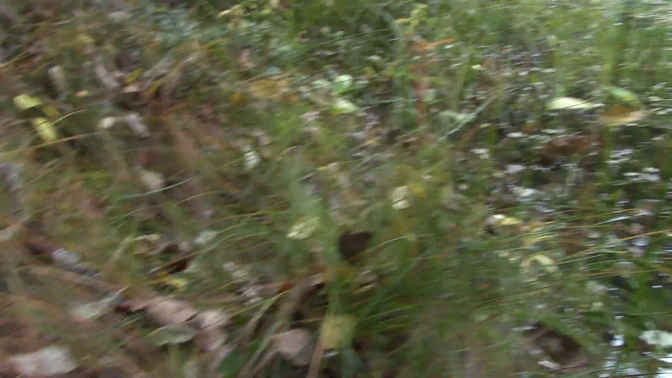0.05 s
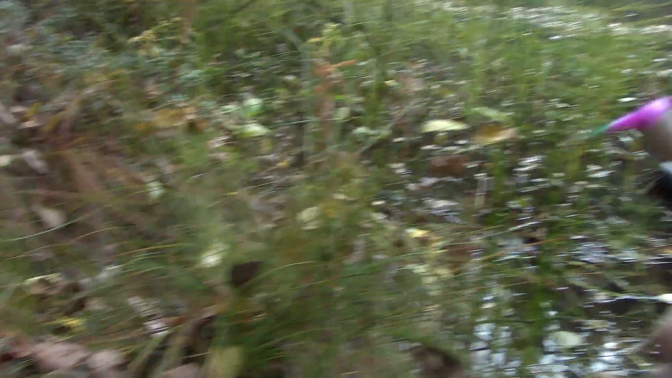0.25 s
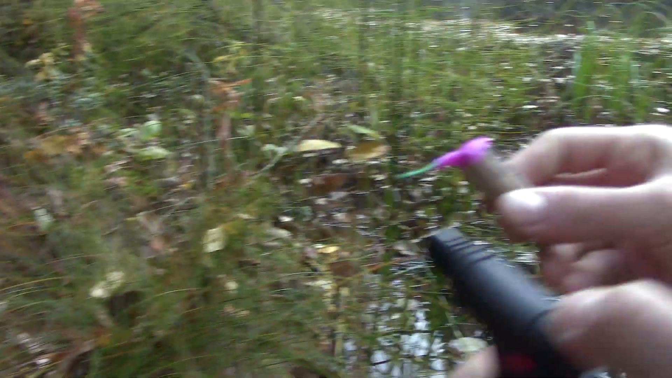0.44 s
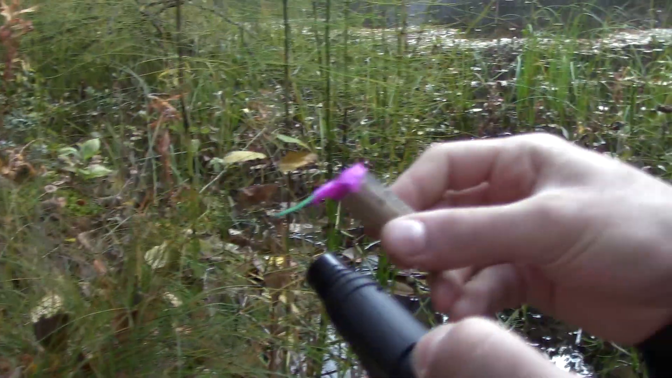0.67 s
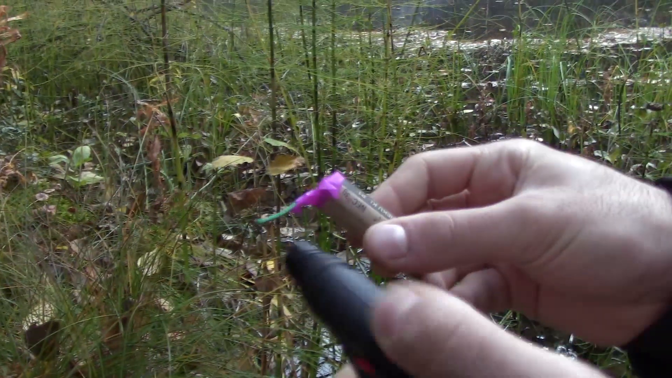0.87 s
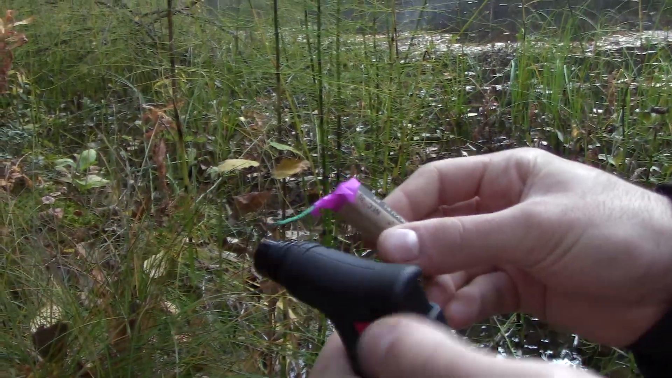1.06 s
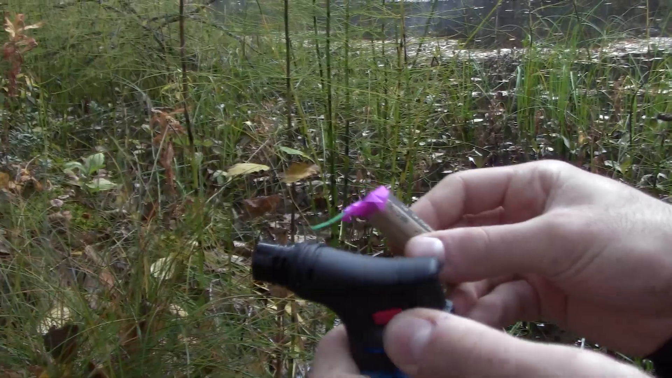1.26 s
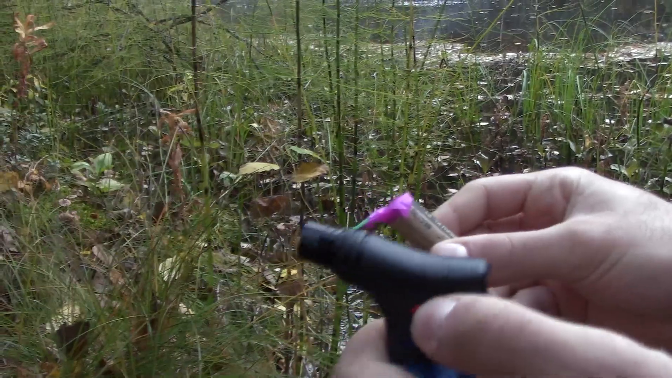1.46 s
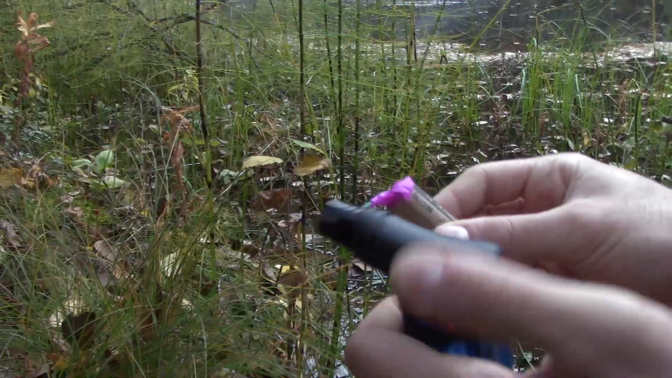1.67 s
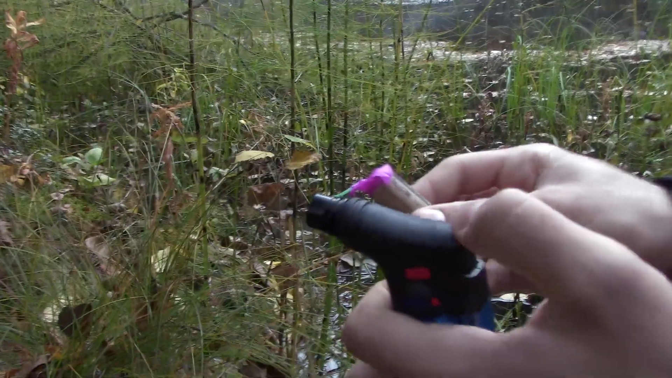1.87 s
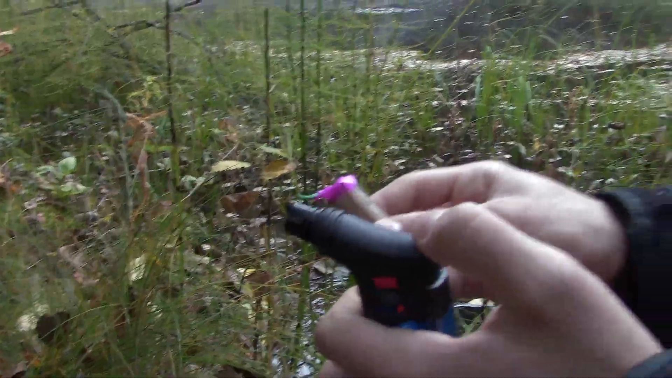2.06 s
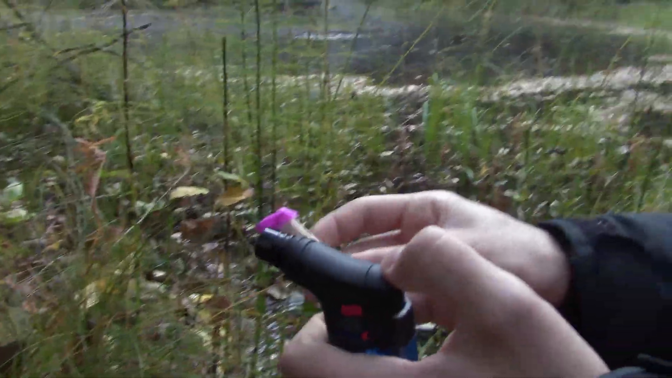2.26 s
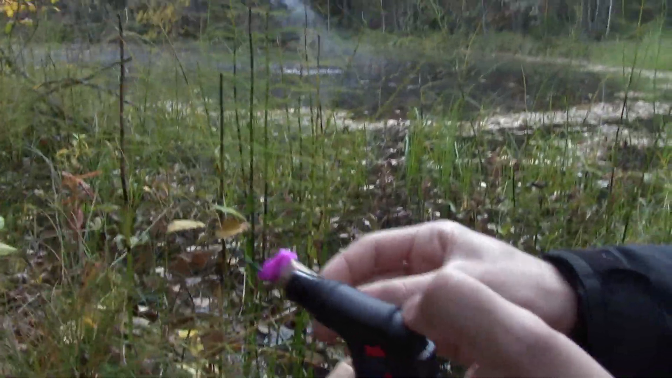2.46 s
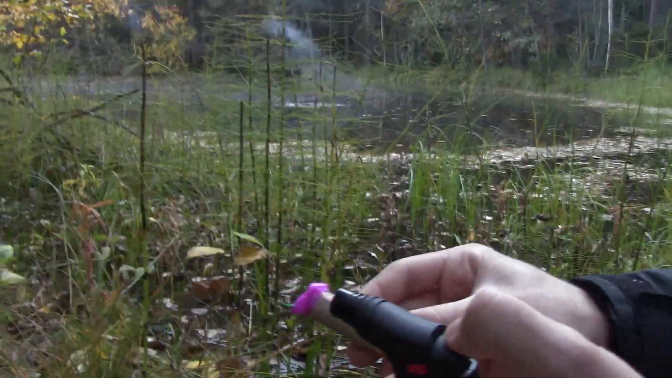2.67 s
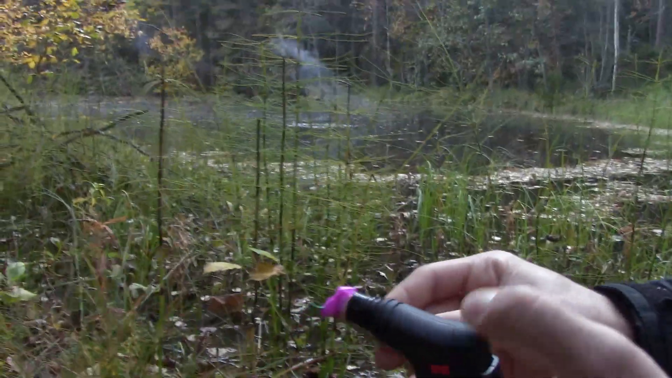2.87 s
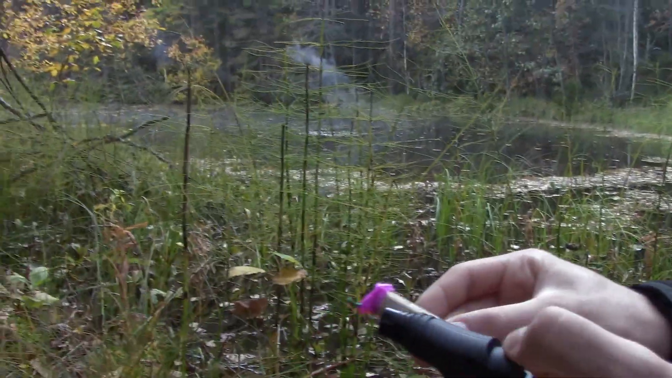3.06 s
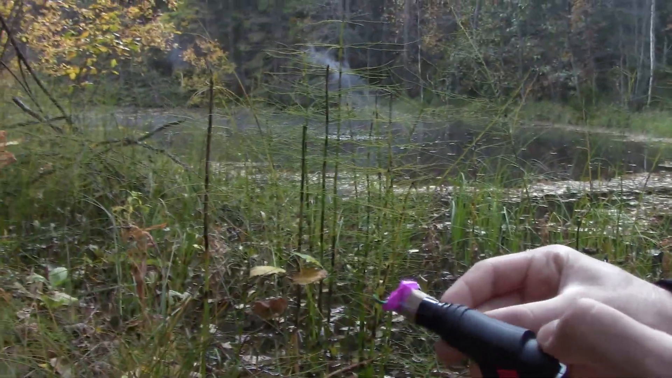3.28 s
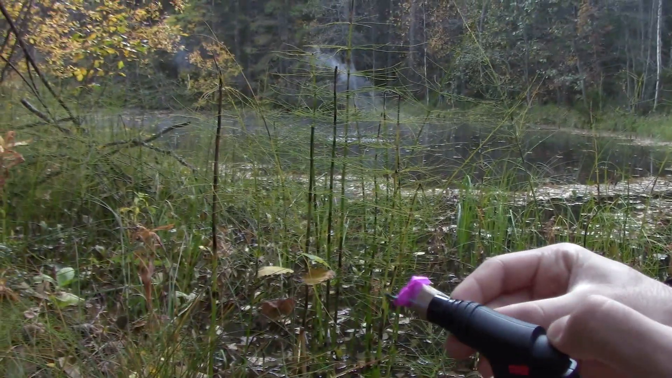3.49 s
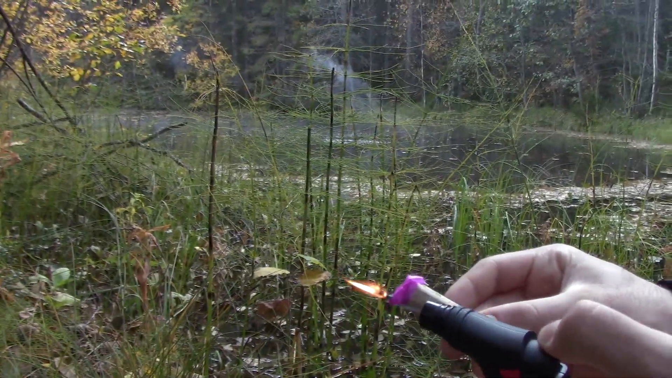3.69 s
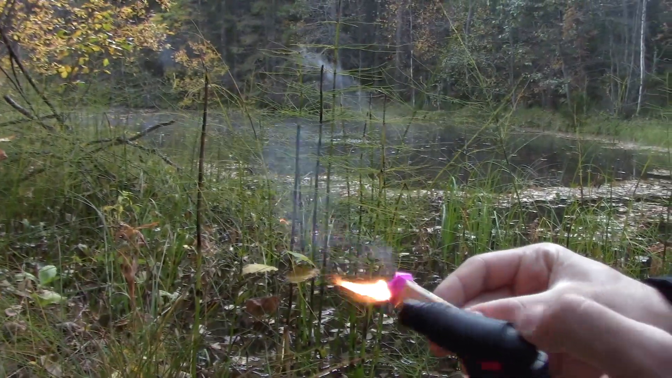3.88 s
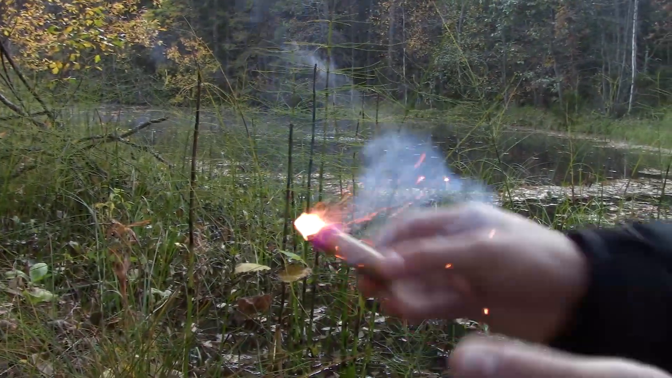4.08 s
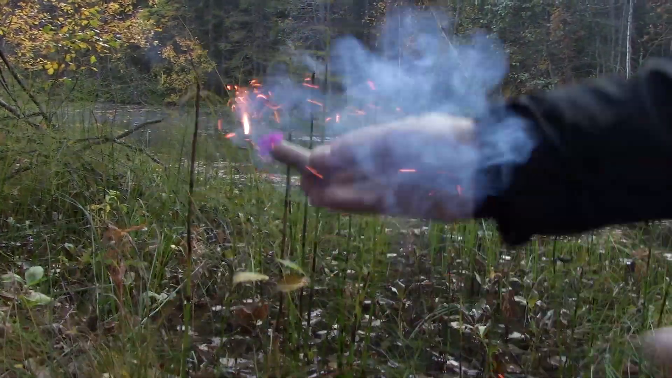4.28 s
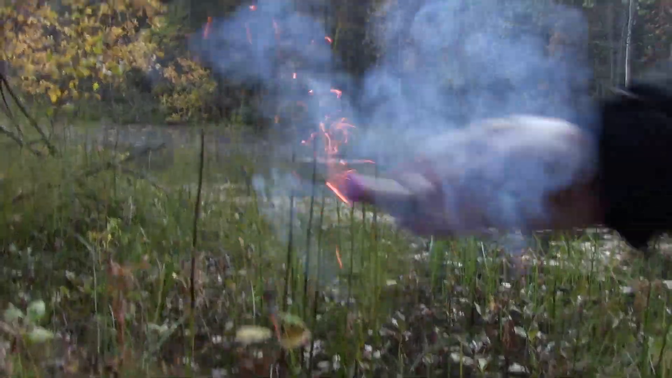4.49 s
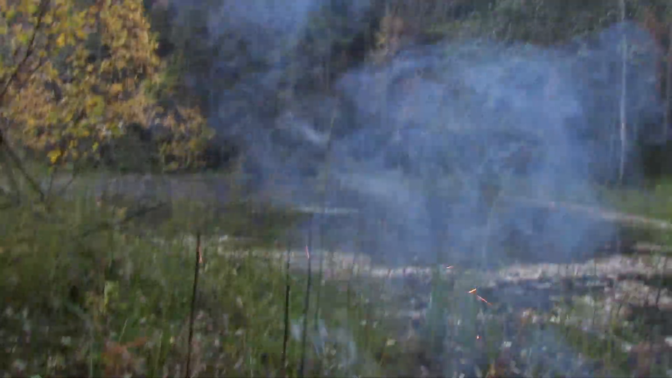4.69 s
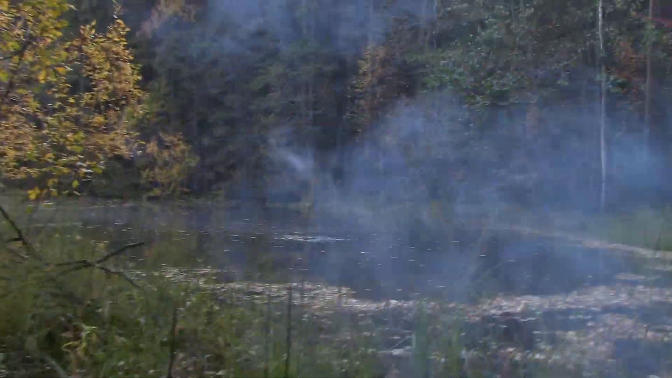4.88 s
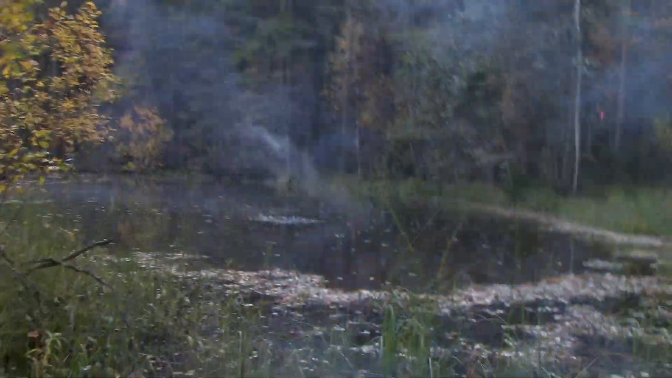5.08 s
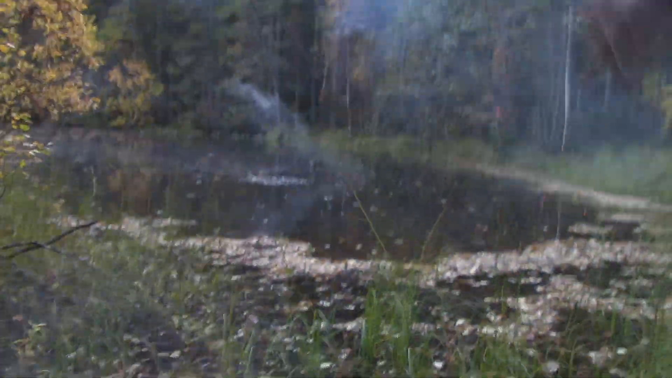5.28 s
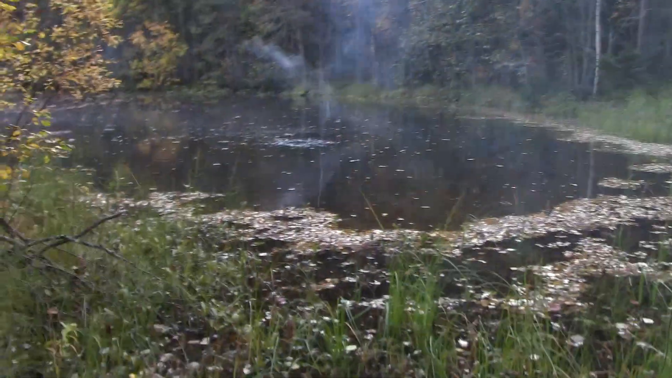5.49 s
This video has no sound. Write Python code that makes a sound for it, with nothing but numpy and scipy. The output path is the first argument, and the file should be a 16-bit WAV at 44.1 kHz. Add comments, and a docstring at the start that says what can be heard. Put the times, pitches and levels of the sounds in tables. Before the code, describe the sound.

Quiet open-air forest bed, faint and steady, with close stereo handling in front. From 0 to 0.35 s, dry grass or sleeve rustle with soft bumps. Between 0.4 and 1.2 s, a cluster of small plastic and metal ticks as the torch is turned, busiest at 0.5-0.9. A crisp fabric stroke comes around 1.6, then hollow tank taps from 1.9 to 2.5. At 2.58 a very loud, sharp trigger snap, followed by thin gas hiss until a release click near 2.87. A second loud snap at 3.07 lights a quiet, flickering roaring jet until about 3.95, ending with a click. The fuse catches at 3.7, fizzing and crackling, swelling from 4.1; a tiny rising whistle at 4.2, then rough spits from 4.4 to 5.0 as it flares. Thrown aside, it weakens into a faint sputter by 5.5, while dry stems snap and feet thud softly from 5.1.

```python
"""Beside a quiet forest pond, hands turn a plastic gas torch over, work its trigger twice and light a fuse.
Touches ring the torch's tank, shell and metal. The first snap only lets gas hiss, the second lights a
roaring jet, both flickering noise. The fuse, noise and ringing grains, flares, spits and whistles once, then
is thrown away and fades while dry stems crack underfoot."""
import sys
import numpy as np
from scipy import signal
from scipy.fft import rfft, irfft, next_fast_len
from scipy.io import wavfile

SR = 44100
rng = np.random.default_rng(int(sys.argv[2]) if len(sys.argv) > 2 else 0)


def field_ratio(decibels):
    """Amplitude ratio for a level in dB (20 dB per decade); scalars and array-likes work."""
    return 10 ** (np.asarray(decibels, dtype=float) / 20)


def unload_audio(sound):
    """Save the sound as a 16-bit wav file, at the path given as the first command line argument."""
    columns = np.transpose(np.atleast_2d(sound))
    # keep every value between -1 and 1, then stretch to whole-number steps
    steps = np.round(np.clip(columns, -1, 1) * 32767)
    wavfile.write(sys.argv[1], SR, steps.astype(np.int16))


N = 244529   # samples

# Forest air spectrum. Each row: frequency in Hz, density in dB per Hz.
FOREST_SPECTRUM = [(20, -31), (110, -14.5), (350, -7.5), (600, -2), (1050, -6), (1450, -9.5), (2000, -15.5),
                   (2700, -22), (7000, -29), (16000, -39)]
# Left-right likeness of noise. Each row: frequency in Hz, likeness from 0 to 1.
LIKENESS_CURVE = [(60, 0.83), (240, .9), (950, 0.99), (15000, 0.81)]
# Dull bumps of hands, arm and feet. Each row: start in seconds, peak in dB, pitch in Hz.
BUMP_EVENTS = [(0.178, -42, 260), (1.517, -38, 613), (1.602, -32, 1310), (2.582, -39.5, 255),
               (2.828, -42.5, 263), (3.074, -36.5, 316), (3.928, -44, 140), (5.21, -40.5, 106),
               (5.252, -32, 444), (5.325, -49, 89), (5.454, -33, 690)]
# Strokes of sleeve and grass. Each row: start, quickest moment and stop in seconds, level in dB and
# brightness in dB, both at the quickest.
STROKE_EVENTS = [(0, .005, 0.23, -55.5, 9), (0.213, 0.27, .35, -64, 2), (1.505, 1.598, 1.66, -53, 7),
                 (2.014, 2.065, 2.09, -66, -3), (2.07, 2.115, 2.9, -70, 10)]
# Dry stems snapping underfoot. Each row: start in seconds, peak in dB, length in ms.
STEM_EVENTS = [(5.1365, -21, 0.1), (5.233, -32, 8.2), (5.27, -33, 1.4), (5.315, -26.5, 0.29)]
# Unlit gas through the nozzle. Each row: time in seconds, level in dB.
GAS_LEVEL = [(2.6, -53.5), (2.83, -53.5)]
# Nozzle hiss spectrum. Each row: frequency in Hz, density in dB per Hz.
NOZZLE_SPECTRUM = [(3000, -22.5), (6400, -20.5), (7800, -8), (8800, -5.5), (10500, -20), (16000, -29)]
# Lit jet. Each row: time in seconds, level in dB.
JET_LEVEL = [(3.08, -44.5), (3.2, -41.5), (3.95, -41)]
# Flame spectrum. Each row: frequency in Hz, density in dB per Hz.
FLAME_SPECTRUM = [(200, -17), (540, -3.5), (1700, 0), (3450, -7), (5400, -19.5), (6600, -15.5),
                  (7800, -14.5), (10000, -20.5), (13000, -20.5), (15600, -23)]
# Gas in the paper tube whistling. One row of moments in seconds: start, loudest, end.
WHISTLE_TIMES = 4.2, 4.225, 4.256
# One row of whistle levels in dB at those moments.
WHISTLE_LEVELS = -35, -22.5, -32
# Loud spits of burning powder. Each row: moment in seconds, peak in dB, centre in Hz.
SPIT_EVENTS = [(4.408, -15.5, 2300), (4.421, -19, 2620), (4.451, -21, 2700), (4.515, -16, 3060),
               (4.54, -15.5, 1820), (4.758, -18, 3100), (4.85, -20.5, 3230), (4.911, -30.5, 1550),
               (5.0, -27, 750)]
# Fuse carried off to one side. Each row: out in seconds, back in seconds, offset (1 = fully aside).
SWING_MOVES = [(4.14, 4.3, 0.43), (4.504, 4.575, 0.37), (4.655, 4.91, 1.0), (5.17, 5.373, 1),
               (5.403, 5.6, 0.61)]
# Band that is hollow while the fuse catches. One row: low edge in Hz, high edge in Hz.
HOLLOW_BAND = [4170, 5700]
# How hollow it is. Each row: time in seconds, depth from 0 to 1.
HOLLOW_DEPTH = [(3.95, 0.52), (4.15, 0.15)]
# Burning fuse. Each row: time in seconds, vigour as sputter level in dB, treble relative to it in dB.
BURN_CURVE = [(3.68, -59, -4), (3.76, -39, -11), (3.85, -40, -10), (3.96, -37.5, -16), (4.11, -34, -14),
              (4.18, -29, -18.5), (4.24, -28, -25), (4.3, -35, -16), (4.36, -34.5, -13.5),
              (4.47, -30.5, -10.5), (4.54, -25.5, -17.5), (4.6, -29.5, -18), (4.68, -32, -12.5),
              (4.78, -32, -30.5), (4.85, -30, -39), (4.93, -36.5, -6), (5.05, -39.5, -15),
              (5.13, -45, -14.5), (5.3, -48, -25.5), (5.54, -53, -21)]
# Low roar of the fuse. Each row: time in seconds, level in dB.
ROAR_LEVEL = [(3.68, -55), (3.84, -44), (4.1, -43), (4.2, -38), (4.29, -38.5), (4.38, -45.5), (4.48, -36.5),
              (4.65, -39.5), (4.75, -39), (4.85, -38), (5.04, -42), (5.12, -53), (5.22, -46), (5.54, -49)]
# Roar spectrum. Each row: frequency in Hz, density in dB per Hz.
ROAR_SPECTRUM = [(60, -23), (130, -10.5), (250, -3.5), (550, 2.5), (1300, -7.5)]
# Hiss of the fuse in layers; the lowest hardly follows the treble's swing, the others about half.
# Each row: low edge in Hz, high edge in Hz, level over the sputter in dB, share of the swing from 0 to 1.
HISS_LAYERS = [(4460, 5900, -11, 0.032), (6550, 7900, -2.5, 0.43), (8700, 9330, -3, 0.53),
               (9700, 11900, -3, 0.62), (13200, 21000, -8, 0.5)]
# Touches on the torch. Each row: start in seconds, peak in dB, hollow tank in dB and metal parts in dB,
# both relative to the plastic shell, contact in ms.
TORCH_TOUCHES = [(0.071, -35, -1, -13, 0.65), (.161, -25.5, 12, -13, 0.57), (.39, -27.5, 5.5, -14, 0.15),
                 (0.4242, -41, -8, -6, .3), (0.4366, -26.5, 7.5, -7.5, 0.4), (.449, -40, -8, 3, 0.35),
                 (.496, -35, -5, -6, 0.31), (0.51, -39, -3, -16, 0.23), (.5253, -22.5, -7, -8, 0.19),
                 (.582, -25, -4, -3, 0.33), (.611, -20, -16, -2, 0.35), (0.6466, -18.5, -15, 1, 0.14),
                 (0.69, -19, -18, -2.5, 0.22), (0.7458, -21, -3, -2, 0.34), (0.853, -19, 2.5, -2.5, 0.7),
                 (0.86, -16.5, 4.5, 4, 0.11), (0.8845, -29, 14, -22, 0.43), (0.9089, -23, -11, -14, 0.084),
                 (0.917, -33, 13, -26, 0.53), (1.112, -40.5, -4, -1, 0.33), (1.168, -23.5, 7.5, 7.5, 0.26),
                 (1.8687, -26.5, 14, -6.5, 0.74), (1.9274, -21.5, 3.5, 1.5, 0.27),
                 (2.243, -27, 10, -8, 0.22), (2.2525, -37, 20, -15, 0.23), (2.3896, -33.5, 10, -11, 0.27),
                 (2.436, -35.5, 12, -3, 0.53), (2.5018, -32.5, 19.5, 11, 3.4), (2.5807, 3.5, 2, 5.5, 0.23),
                 (2.8296, -29, 14, 6, 1.44), (2.872, -7, 4.5, 4, 0.37), (2.958, -13.5, 15.5, -11.5, 0.13),
                 (3.0318, -31, 14, 3, 1.86), (3.0713, 3.5, 3, 1.5, 0.28), (3.933, -27, 15, -5, 2.2),
                 (3.9629, -4.5, -5, -2.5, 0.7)]
# Modes of the torch: tank under 2 kHz, shell to 5 kHz, metal above. Each row: pitch in Hz, level in dB,
# free 60 dB decay in seconds.
TORCH_MODES = [(1433, -4.5, 0.01), (2300, 0.5, 0.0007), (2966, -1, 0.0066), (3285, -10.5, 0.031),
               (4190, -1, 0.0025), (5110, -5, 0.0052), (6590, -5, 0.015), (7125, 1, 0.009),
               (7500, 5.5, 0.0018), (8310, -0.5, 0.011), (9250, -4, 0.0073), (10120, -10.5, 0.012),
               (10770, -7, 0.0039), (13160, -20, 0.0083), (15400, -19.5, 0.0073)]


def rms_one(x):
    """Scale to unit rms."""
    return x / np.sqrt(np.mean(x ** 2) + 1e-20)


def in_time(rows, fade_s=0.0047):
    """Columns as curves per sample, after a gate that fades in and out at the ends of the table."""
    s, *columns = np.transpose(rows)
    t = np.arange(N) / SR
    gate = np.clip(np.minimum(t - s[0] + fade_s, s[-1] + fade_s - t) / fade_s, 0, 1)
    return [gate] + [np.interp(t, s, column) for column in columns]


def at_hz(points, hz):
    """Read a spectrum on a log-frequency axis."""
    point_hz, values = np.transpose(points)
    return np.interp(np.log(hz), np.log(point_hz), values)


def drift(rate):
    """Slow chance of spread 1, changing about rate times a second."""
    r = np.exp(-80 * np.pi * rate / SR)   # drawn once every 40 samples
    noise = rng.standard_normal(N // 40 + 2002)
    slow = signal.lfilter([1], [1, -2 * r, r * r], noise)[2000:]
    return np.interp(np.arange(N) / 40, np.arange(len(slow)), rms_one(slow))


def ring(clicks, hz, t60):
    """A unit click sets a decaying sine of about unit height ringing."""
    r, w = field_ratio(-60 / (t60 * SR)), 2 * np.pi * hz / SR
    return signal.lfilter([0, np.sin(w)], [1, -2 * r * np.cos(w), r * r], clicks + 1e-18)


def thin(x, hz):
    """Steep low cut."""
    return signal.sosfilt(signal.butter(4, hz, "high", fs=SR, output="sos"), x)


def dull(x, hz):
    """Gentle high cut."""
    return signal.sosfilt(signal.butter(2, hz, fs=SR, output="sos"), x)


def coloured(spectrum, x):
    """Shape a steady sound by a spectrum that falls away steeply beyond its ends; rms 1."""
    size = next_fast_len(N)
    hz = np.maximum(np.fft.rfftfreq(size, 1 / SR), 10)
    octaves_beyond = np.abs(np.log2(hz / np.clip(hz, spectrum[0][0], spectrum[-1][0])))
    gain = field_ratio(at_hz(spectrum, hz) - 24 * octaves_beyond)
    return rms_one(irfft(rfft(x, size) * gain, size)[..., :N])


def air(spectrum, flicker_db, rate, width=0.1):
    """Turbulent noise, its level flickering; width sets how far the channels differ."""
    mid, side = rng.standard_normal((2, next_fast_len(N)))
    hz = np.maximum(np.fft.rfftfreq(len(side), 1 / SR), 10)
    unlike = np.sqrt(np.clip(1 - at_hz(LIKENESS_CURVE, hz), 0, 1))
    side = irfft(rfft(side) * unlike, len(side)) * width
    return coloured(spectrum, np.array([mid + side, mid - side])) * field_ratio(flicker_db * drift(rate))


def grains(per_s, spread_db):
    """Clicks at random moments, a few much larger than the rest."""
    sizes = field_ratio(spread_db * np.minimum(rng.exponential(1, N), 5)) * rng.choice([-1, 1], N)
    return sizes * (rng.random(N) < per_s / SR)


def burst(length_ms, noise):
    """A noise that swells and dies within a few lengths."""
    t = np.arange(len(noise)) / (max(length_ms, 0.03) * SR / 1000)
    return noise * t * np.exp(-t)


def add(out, s, peak_db, sound):
    """Place a sound with a given peak."""
    at = round(s * SR)
    out[at:at + len(sound)] += (field_ratio(peak_db) * sound / np.max(np.abs(sound)))[:N - at]


def aside(x, offset):
    """Off centre, a source is louder in the near channel and reaches it a fraction of a sample sooner."""
    side = offset * (0.049 * x + 0.3 * np.gradient(x, axis=-1))
    return x + side * np.array([[-1], [1]])


def forest():
    """Quiet air all around: wide noise that flickers slowly."""
    return field_ratio(-51) * air(FOREST_SPECTRUM, flicker_db=0.5, rate=4, width=1.0)


def hum():
    """A faint steady sine, slightly stronger on the left."""
    hum_hz, peak_db = 69, np.array([[-72], [-74]])
    return field_ratio(peak_db) * np.sin(2 * np.pi * hum_hz * np.arange(N) / SR)


def trees(x):
    """Scattered, duller returns from ground, hands and stems, different on each side."""
    build_s, t60 = 0.0058, 0.079
    t = np.arange(round(0.06 * SR)) / SR
    tail = rng.standard_normal((2, len(t))) * field_ratio(-60 * t / t60) * np.minimum(t / build_s, 1)
    tail = dull(tail[0] + 0.22 * tail[1] * np.array([[1], [-1]]), 8700)
    return field_ratio(-40) * signal.fftconvolve(x[None], tail, axes=1)[:, :N]


def bumps():
    """A soft push that rings a couple of cycles."""
    out = np.zeros(N)
    for s, peak_db, hz in BUMP_EVENTS:
        push = burst(120 / hz, np.ones(2500))
        add(out, s, peak_db, thin(ring(push, hz, 2.0 / hz), 0.85 * hz))
    return out


def rustle():
    """Dense dry fibre clicks; each stroke swells, is brightest at its quickest, sags and stops short."""
    swell_db, sag_db_per_s = 10, 25
    calm_db, quick_s = -13, 0.017   # brightness away from the quickest moment, and how long that lasts
    shared = grains(6000 * field_ratio(1.5 * drift(40)), spread_db=1.5)
    fibres = shared + grains(9000, spread_db=1.5)[None] * [[0.12], [-0.12]]
    soft = coloured([(600, -18), (2200, 0), (3300, -3), (4800, 4), (6500, 1), (9000, -16)], fibres)
    bright = coloured([(5000, -0.5), (7000, 1.5), (11000, 4), (16000, -19.0)], fibres)
    out, t = 0, np.arange(N) / SR
    for start, quickest, stop, db, bright_db in STROKE_EVENTS:
        start_db = db - swell_db * min(1, quickest / 0.05)   # less swell at the very opening
        stop_db = db - sag_db_per_s * (stop - quickest)
        gate, level_db = in_time([(start, start_db), (quickest, db), (stop, stop_db)])
        tilt_db = calm_db + (bright_db - calm_db) * np.exp(-((t - quickest) / quick_s) ** 2)
        out = out + gate * field_ratio(level_db) * (soft + field_ratio(tilt_db) * bright)
    return out


def stems():
    """Broad dry cracks: noise bursts through a heavily damped ring."""
    out = np.zeros(N)
    noises = rng.standard_normal((len(STEM_EVENTS), 1000))
    for (s, peak_db, length_ms), noise in zip(STEM_EVENTS, noises):
        crack = ring(burst(length_ms, noise), 1800, 0.00019)
        add(out, s, peak_db, thin(dull(crack, 7500), 600))
    return out


def gas_jet():
    """Cold gas whistles thinly through the nozzle; lit, it roars broad and low."""
    (open_gate, gas_db), (lit_gate, jet_db) = in_time(GAS_LEVEL), in_time(JET_LEVEL)
    cold = open_gate * field_ratio(gas_db) * air(NOZZLE_SPECTRUM, flicker_db=0.6, rate=15)
    lit = lit_gate * field_ratio(jet_db) * air(FLAME_SPECTRUM, flicker_db=0.8, rate=18)
    return cold + lit


def whistle():
    """Gas in the paper tube: a rising, slightly breathy tone that levels off in pitch."""
    start_hz, glide_hz_per_s, top_hz = 1550, 13500, 2060
    gate, db = in_time(list(zip(WHISTLE_TIMES, WHISTLE_LEVELS)), fade_s=0.0047)
    since_start = np.arange(N) / SR - WHISTLE_TIMES[0]
    hz = np.clip(start_hz + glide_hz_per_s * since_start, start_hz, top_hz)
    breathy_hz = hz * (1 + 0.013 * drift(160))
    return gate * field_ratio(db + 2.1 * drift(120)) * np.sin(2 * np.pi * np.cumsum(breathy_hz) / SR)


def spits():
    """A larger grain pops: a crackling puff, ringing briefly at its own pitch."""
    out = np.zeros(N)
    noises = rng.standard_normal((len(SPIT_EVENTS), 1500))
    for (s, peak_db, hz), noise in zip(SPIT_EVENTS, noises):
        puff = burst(3.7, noise ** 3)   # cubing makes it crackle
        pop = ring(puff, hz, 6.4 / hz) + ring(puff, 1.44 * hz, 4.6 / hz)
        add(out, s - 0.003, peak_db, pop)
    return thin(out, 220)


def swing():
    """How far aside the fuse is held."""
    move_s = 0.076   # time to move out or back
    t = np.arange(N) / SR
    offsets = 0.27
    for out_s, back_s, offset in SWING_MOVES:
        offsets = offsets + offset * np.clip(0.5 + np.minimum(t - out_s, back_s - t) / move_s, 0, 1)
    return offsets


def hollow(x):
    """Take a band partly out, less as the burn takes hold."""
    band = signal.sosfiltfilt(signal.butter(2, HOLLOW_BAND, "band", fs=SR, output="sos"), x)
    return x - np.clip(in_time(HOLLOW_DEPTH)[1], 0, 1) * band


def fuse():
    """Hot gas roars and hisses; grains of powder burst in clumps, each with a very short ring."""
    gate, sputter_db, treble_db = in_time(BURN_CURVE, fade_s=0.021)
    clumps = drift(30)
    bursts = grains(4500 * field_ratio(2.8 * clumps), spread_db=2)
    pitches = np.geomspace(900, 5200, 16)   # Hz
    dealt = rng.integers(0, 16, N)   # which pitch each grain gets
    sputter = rms_one(sum(ring(bursts * (dealt == k), hz, 0.45 / hz) for k, hz in enumerate(pitches)))
    breath = air([(800, -20), (1200, 0), (5000, -3), (7000, -25)], flicker_db=1.5, rate=20)
    sputter = dull(thin(sputter, 1000), 5500) + 0.12 * breath
    gases = field_ratio(in_time(ROAR_LEVEL)[1]) * air(ROAR_SPECTRUM, flicker_db=1.2, rate=10)
    for low, high, db, share in HISS_LAYERS:
        band = [(0.84 * low, -14), (low, 0), (high, 0), (1.225 * high, -14)]
        hiss_db = sputter_db + db + share * treble_db
        gases = gases + field_ratio(hiss_db) * air(band, flicker_db=2.2, rate=7)
    return gate * (field_ratio(sputter_db) * sputter + field_ratio(0.7 * clumps) * gases)


def torch():
    """Each touch is a brief scrape into every mode; fingers damp the light ticks, the trigger's snaps ring free."""
    held_t60 = 0.0055   # seconds, longest ring of shell and metal under the fingers
    soft_top_db = -6   # light touches hardly stir the modes over 8 kHz
    bounce_s, bounce = 0.0027, 0.3   # delay and share of the rebound
    noises = rng.standard_normal((len(TORCH_TOUCHES), 2600))
    strengths = rng.normal(0, 1, (len(TORCH_TOUCHES), len(TORCH_MODES)))
    out = np.zeros(N)
    for touch, noise, strength in zip(TORCH_TOUCHES, noises, strengths):
        s, peak_db, tank_db, metal_db, contact_ms = touch
        free = np.clip((peak_db + 5) / 7, 0, 1)
        hard = np.clip((peak_db + 14) / 6, 0, 1)
        scrape = burst(contact_ms, noise)
        force = contact_ms * scrape / np.linalg.norm(scrape)
        force[round(contact_ms * SR / 1000)] += 1   # the contact breaks with one sharp click
        force[round(bounce_s * SR)] += bounce * free   # a freed part strikes once more
        sound = 0
        for k, ((hz, level_db, t60), own) in enumerate(zip(TORCH_MODES, strength)):
            part_db = tank_db if hz < 2000 else metal_db if hz > 5000 else 0
            part_db += soft_top_db * (1 - hard) * (hz > 8000)
            decay = t60
            if hz >= 2000:
                decay = min(t60, held_t60) + free * max(t60 - held_t60, 0)
            mode = ring(dull(force, hz), hz, decay)   # a mode takes up little above its own pitch
            gain = (-1) ** k * field_ratio(part_db + level_db + 2.5 * own)
            sound = sound + gain * mode / np.max(np.abs(mode))
        add(out, s, peak_db, thin(sound, 1270))
    return out


def scene():
    """Hands, torch and fuse are close in front of the microphone; the forest lies all around."""
    hits = torch() + spits() + stems() + whistle()
    burning = aside(hollow(fuse()), swing())
    left_bumps = bumps() * field_ratio(np.array([[1.5], [-1.5]]))   # dB, left and right
    close = aside(hits, 0.43) + left_bumps + rustle() + gas_jet() + burning
    return close + trees(hits) + hum() + forest()


def band_limit(x):
    """A steep low-pass at the top of the band."""
    return signal.sosfilt(signal.butter(12, 16780, fs=SR, output="sos"), x)


def record(dry):
    """A steep cut ends the treble at 16 kHz, a low cut thins the deepest bass, and the loudest snaps clip."""
    topped = signal.sosfilt(signal.cheby2(14, 42, 16000, fs=SR, output="sos"), dry)
    mix = np.clip(thin(topped, 25.3), -1, 1)
    return band_limit(mix)


dry = scene()
out = record(dry)
unload_audio(out)
```